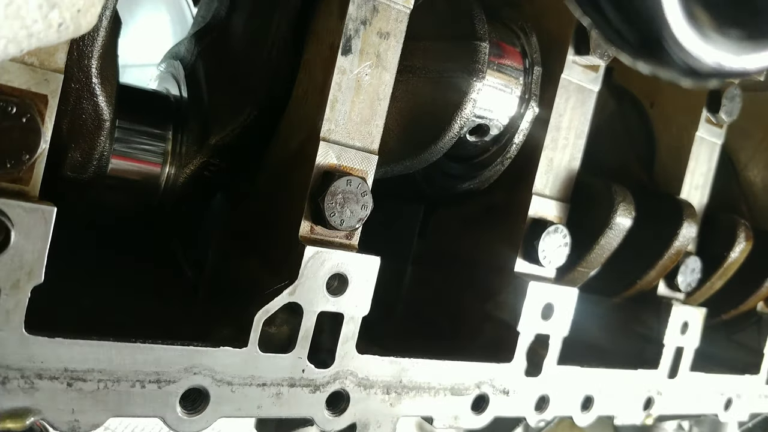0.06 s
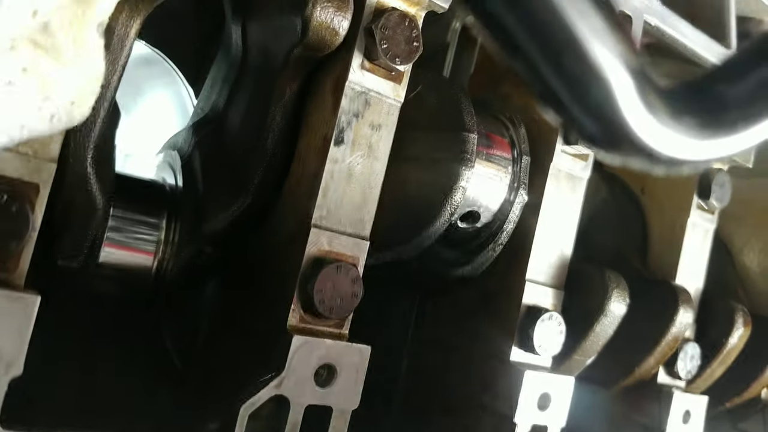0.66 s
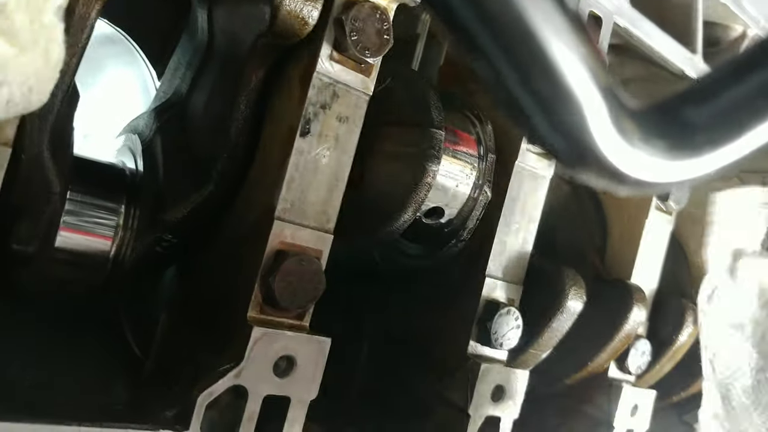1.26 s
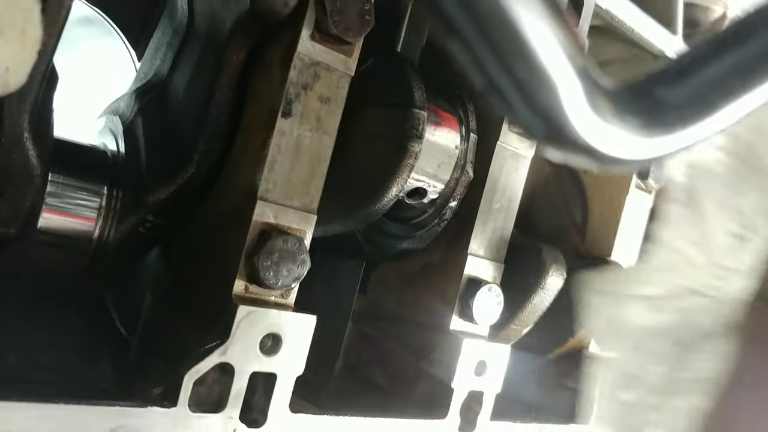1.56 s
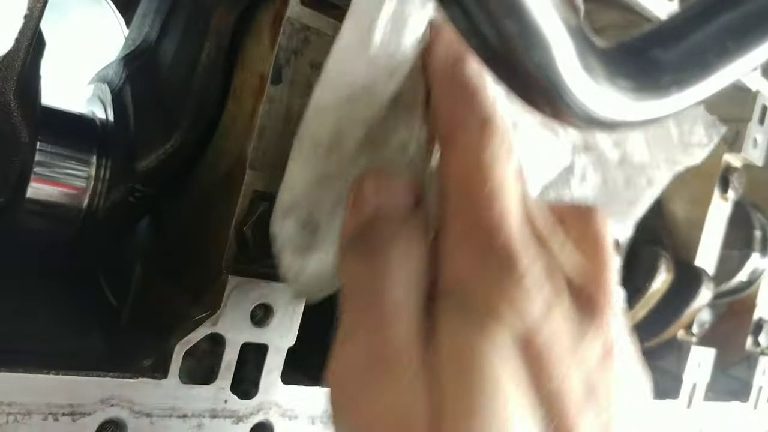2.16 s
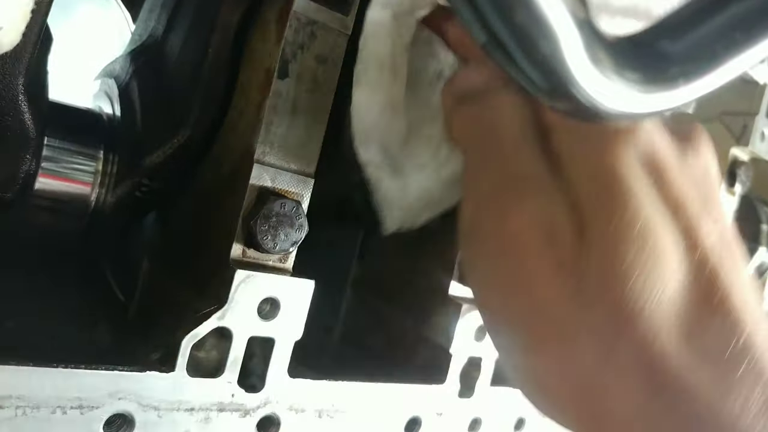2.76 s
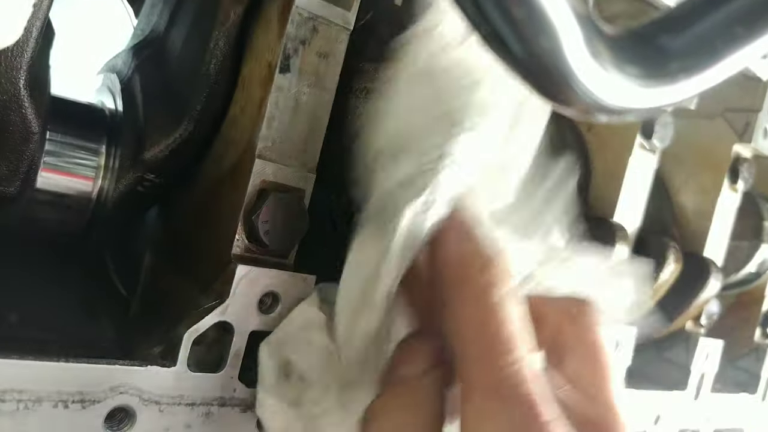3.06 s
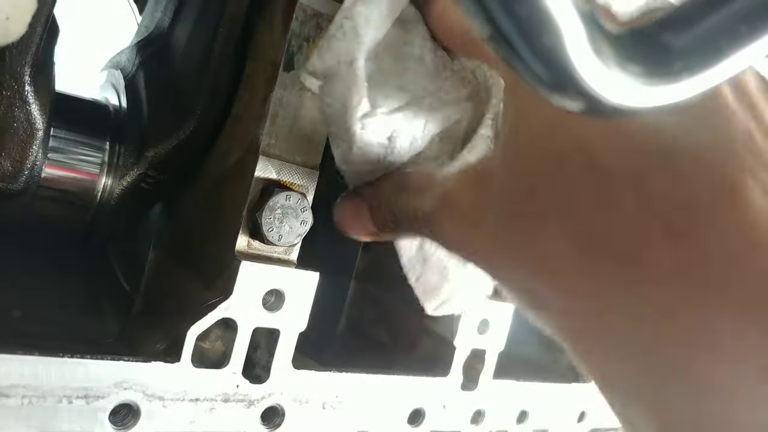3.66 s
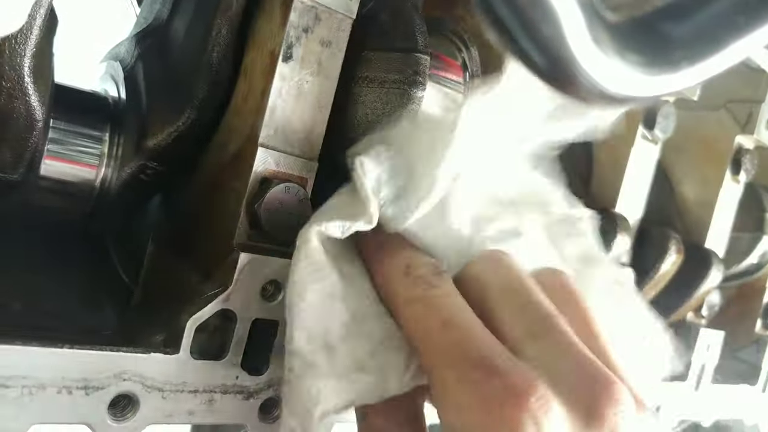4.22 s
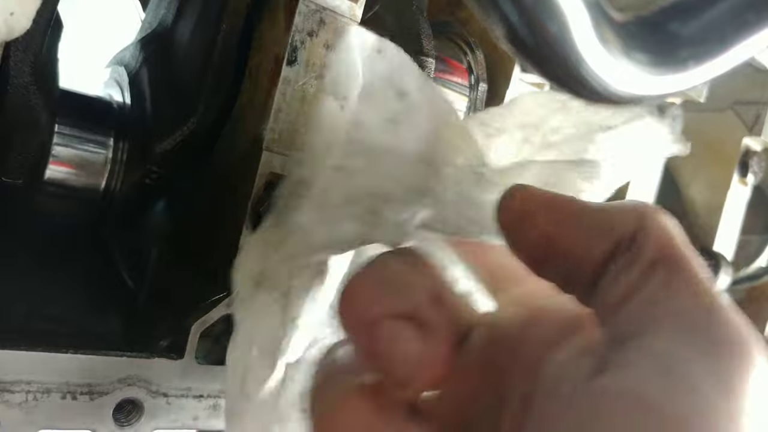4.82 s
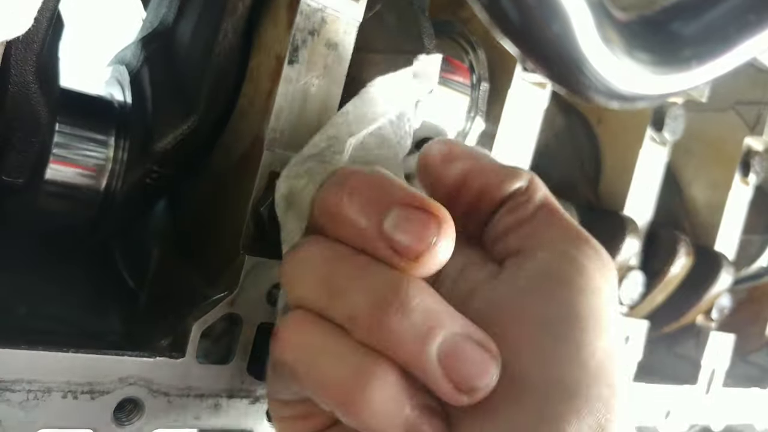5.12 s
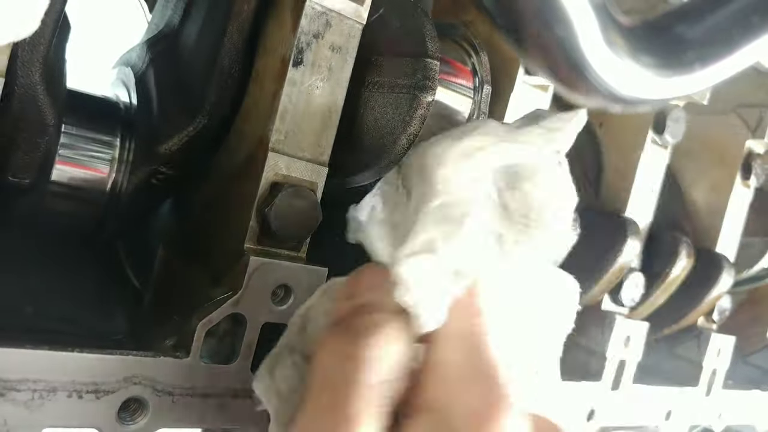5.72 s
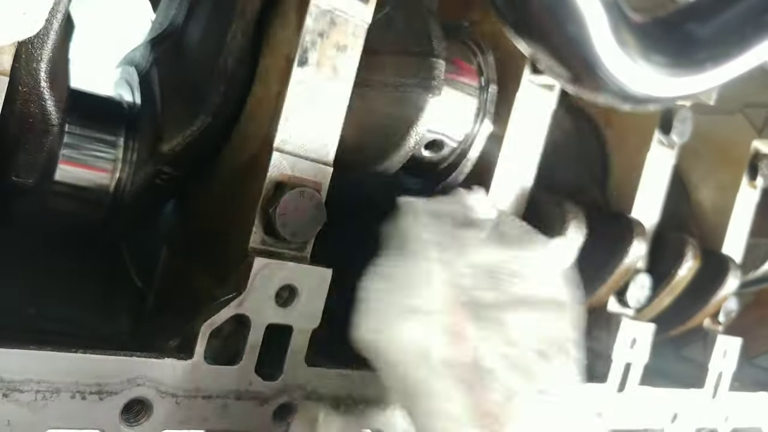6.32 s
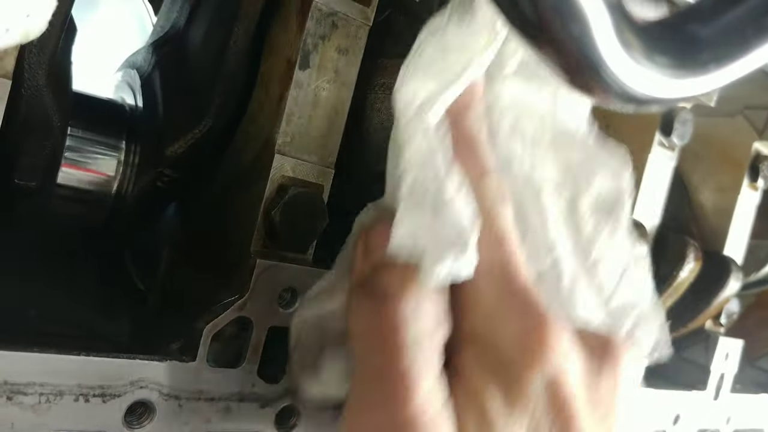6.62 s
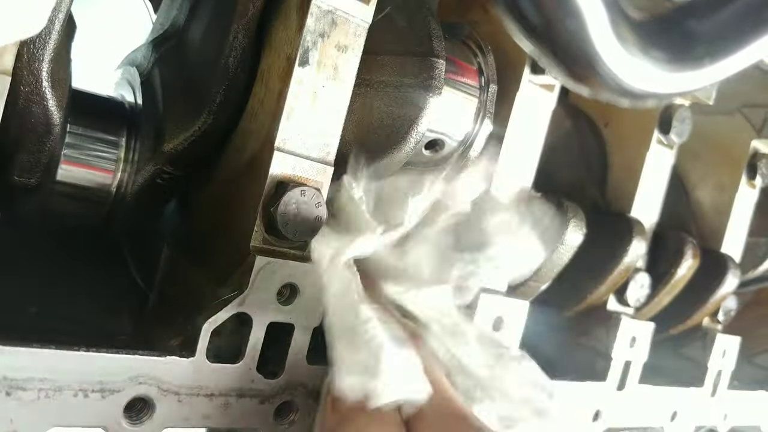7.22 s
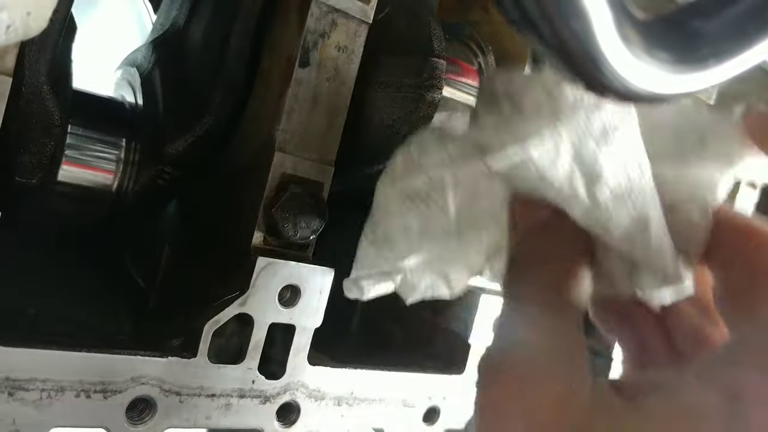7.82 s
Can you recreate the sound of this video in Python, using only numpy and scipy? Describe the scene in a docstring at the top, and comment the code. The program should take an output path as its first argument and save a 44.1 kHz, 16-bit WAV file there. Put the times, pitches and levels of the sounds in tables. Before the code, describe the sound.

A cloth rag wipes back and forth over a steel engine part, rustling and crumpling close by in a quiet workshop.

```python
"""A cloth rag wipes to and fro over a polished crankshaft in an open engine block.
It is brought past a phone, rubbed on the steel and lifted off, each stroke swelling with the hand's speed.
Fibres catch and slip in a hiss, buckling folds ring the hollow crankcase, and loose cloth fans the air.
Folds snap, the hand bumps and knocks, and the rag squeaks once and scrapes once. The workshop is quiet."""
import sys
import numpy as np
from scipy import signal
from scipy.fft import rfft, irfft
from scipy.io import wavfile
from scipy.ndimage import uniform_filter1d

SR = 44100
rng = np.random.default_rng(int(sys.argv[2]) if len(sys.argv) > 2 else 0)


def transcribe(signal):
    """Save signal, clipped to [-1, 1], as a 16-bit WAV file at the path in sys.argv[1]."""
    frames = np.atleast_2d(signal).T
    limited = np.clip(frames, -1, 1)
    pcm = np.round(limited * 32767).astype(np.int16)
    wavfile.write(sys.argv[1], SR, pcm)


N = 347508
T = np.arange(N) / SR
FREQS = np.fft.rfftfreq(N, 1 / SR)


def undb(db):
    """Turn decibels into a number to multiply by."""
    return 10 ** (np.asarray(db) / 20)


def over_hz(points):
    """Join the rows of a (frequency, value) table into a curve."""
    hz, value = np.transpose(points)
    return np.interp(np.log(FREQS + 1), np.log(hz), value)


def shape(x, response):
    """Turn each frequency of a sound up or down."""
    return irfft(rfft(x) * response, N)


def above(hz, order):
    """A filter curve that keeps what lies above hz; a higher order cuts more steeply."""
    ratio = (FREQS / hz) ** order
    return ratio / np.sqrt(1 + ratio ** 2)


def unit(pair):
    """Scale a stereo pair so that the mean of its two sides has strength (rms) 1."""
    return pair / np.std(pair.mean(axis=0))


def steady(pair, span_s):
    """Even out the strength over span_s, keeping the quick flutter."""
    power = uniform_filter1d(pair.mean(axis=0) ** 2, int(span_s * SR))
    return pair / np.sqrt(power + 1e-4 * power.mean())


def walk(per_s):
    """A smooth random wobble, about 1 in size."""
    step = int(SR / per_s)
    stairs = np.repeat(rng.standard_normal(N // step + 1), step)
    return np.sqrt(1.5) * uniform_filter1d(stairs, step)[:N]


def slips(per_s, spread_db):
    """Two streams of tiny clicks, random in time and size."""
    hit = rng.random((2, N)) < per_s / SR
    size = undb(spread_db * np.minimum(rng.exponential(size=(2, N)), 4))
    return hit * size * rng.choice([-1, 1], (2, N))


# How much louder the left microphone is for each place of the rag: f/Hz, left minus right/dB
BALANCE_BESIDE = [(100, -3), (300, 1), (700, 0.6), (1300, 4), (2000, 7.9), (3600, 6), (4800, 0.1),
                  (6300, 2), (11000, 3.9)]
BALANCE_INSIDE = [(60, 39), (320, 5.5), (470, 1), (620, 1.5), (850, 4), (1150, 3), (1600, 12), (2500, 8.5),
                  (3900, 5), (4700, -8), (5700, 2.5), (6500, -5), (8000, 9), (11000, 13)]
BALANCE_LIFTED = [(400, 4), (850, 2), (1200, 3), (1700, 13), (2500, 6.5), (3900, 8), (4700, -1.5),
                  (5700, 4), (6500, 9), (8000, 4), (11000, 13)]
# How alike the two microphones sound: f/Hz, likeness from 0 to 1
LIKENESS = [(50, 0.41), (200, 1), (320, 0.86), (480, 0.74), (900, 0.51), (1700, 0.069), (2600, 0.35),
            (4000, 0.1), (8000, 0.028)]
def microphones(pair, balance, lead_rad=0.48):
    """Both microphones share the lows, the left ahead by lead_rad; each hears its own treble."""
    alike = np.clip(over_hz(LIKENESS), 0, .99)
    left, right = undb(over_hz(balance) / 2), undb(-over_hz(balance) / 2)
    shared, own = rfft(pair)
    blend = alike * np.exp(-1j * lead_rad) * shared + np.sqrt(1 - alike ** 2) * own
    middle = np.sqrt(left ** 2 + right ** 2 + 2 * alike) / 2
    return irfft(np.array([left * shared, right * blend]) / middle, N)


def places():
    """How much of the rag is beside the phone, inside the block and lifted clear."""
    entered = np.interp(T, [1.70, 1.80], [0, 1])
    lifted = np.interp(T, [7.24, 7.42], [0, 1])
    return 1 - entered, entered - lifted, lifted


def hand_speed(peak, rise, fall):
    """The hand speeds up and slows to rest. Gives the stroke's samples and its speed from 0 to 1."""
    span = slice(*np.searchsorted(T, [peak - rise, peak + fall]))
    ramp = np.interp(T[span], [peak - rise, peak, peak + fall], [0, 1, 0])
    return span, np.sin(np.pi / 2 * ramp)


# A held rag never lies quite still. What is left between strokes: part of the sound, level/dB
RESTING_DB = {"weave": -78.5, "fibres": -80, "nap": -92, "folds": -80, "air": -79.5}
# Strokes of the rag: fastest moment t/s, speeding up/s, slowing down/s, base level of the weave/dB,
# then fibres/dB, nap/dB, folds/dB and air/dB compared with the weave, and leftward lean/dB before scaling
STROKES = [(0.045, 0.26, 0.23, -45.5, -9, -19.5, -7.5, -10, 7),
           (0.283, 0.1, 0.14, -51, -1, -17.5, -1.5, -4.5, 11),
           (0.494, 0.17, 0.052, -51, 0.5, -15, -2.5, -5, 20.5),
           (0.594, 0.2, 0.076, -58.5, -1, -18, -5.5, -1.5, 18),
           (0.731, 0.09, 0.037, -62.5, 1, -15, -1.5, 2.5, 12),
           (0.792, 0.067, 0.076, -51, 0, -14, -6.5, -12.5, 18),
           (0.93, 0.098, 0.14, -53, 0.5, -16.5, -6.5, -5.5, 20),
           (1.164, 0.11, 0.1, -61, 2.5, -13, -14, -7, 9), (1.254, 0.05, 0.35, -63, -2, -17, -6.0, -2, 14),
           (1.787, 0.031, 0.19, -58.5, -2, -24, -3, -12, 22), (1.893, 0.12, 0.13, -60, -5, -14, 4.5, 3, 1),
           (2.17, 0.16, 0.06, -64, -1, -12, 2.5, -3, 13),
           (2.283, 0.19, 0.068, -45.0, -8.5, -22, -5, -14.5, 8.5),
           (2.425, 0.11, 0.16, -51.5, -8.5, -18, -1, -16.0, 12.5),
           (2.539, 0.11, 0.38, -67, -5, -12, 11, 1, 6),
           (2.794, 0.16, 0.095, -45.5, -6.5, -21.0, -1.5, -18.0, 11.5),
           (3.01, 0.19, 0.14, -52, -9, -17.5, -1.5, -17.5, 13.5),
           (3.165, 0.087, 0.053, -47, -5, -17.5, -1.5, -10, 8),
           (3.254, 0.067, 0.12, -51.5, -1, -15, 2.5, -12, 13),
           (3.406, 0.054, 0.08, -60, -6, -18, 5.5, 2, 16), (3.513, 0.1, 0.36, -48.5, -5, -13, 0, -17, 10.5),
           (3.694, 0.091, 0.125, -46, -6.5, -16, -6.5, -11.5, 10),
           (3.888, 0.067, 0.22, -56.5, -11, -19, -8, -24, 13),
           (4.05, 0.12, 0.16, -48.5, -7.5, -14, -0.5, -19.5, 9.5),
           (4.2, 0.07, 0.1, -62.5, -8, -16, -1, -5, 16), (4.312, 0.069, 0.094, -48, -12, -15.5, 1, -19, 3),
           (4.37, 0.078, 0.091, -52, -4, -18, 3, -22, 13),
           (4.481, 0.087, 0.12, -47.5, -5, -17.5, 0, -15.5, 8),
           (4.596, 0.031, 0.062, -47.5, -14.5, -25, -1.5, -12, 11),
           (4.672, 0.054, 0.28, -59, -5.5, -15.5, 3, -7, 16),
           (4.908, 0.021, 0.39, -49.5, -8, -18, -0.5, -14.5, 10.0),
           (5.13, 0.16, 0.12, -42.5, -1.5, -16, -5, -30, 7),
           (5.321, 0.096, 0.2, -51, -4.5, -17, -6.5, -15.5, 12),
           (5.513, 0.023, 0.043, -45.5, -9.5, -19.5, -6.5, -13, 4),
           (5.542, 0.21, 0.19, -60, -6.5, -15.5, -5, -12, 11),
           (5.762, 0.13, 0.051, -57, -6.0, -12.5, -13, -12, 7.0),
           (5.895, 0.11, 0.15, -52.5, -4.5, -15, -3.5, -10, 8.0),
           (6.034, 0.063, 0.27, -53.5, -11, -19.5, -7, -11.5, 10.0),
           (6.13, 0.09, 0.11, -66.5, -21, -23, 8.5, -8, -2),
           (6.321, 0.095, 0.11, -42.5, -6, -15, -2.5, -14, 7.0),
           (6.379, 0.12, 0.15, -53, -1, -15, 6.5, -9, 9),
           (6.661, 0.07, 0.39, -64.5, -3.5, -11, 6, -4.5, 7.0),
           (6.93, 0.15, 0.082, -45.5, -5, -13.5, -7, -14.5, 10),
           (7.105, 0.17, 0.087, -50, -2, -11.5, -6.5, -10, 8.5),
           (7.179, 0.046, 0.072, -46.5, -10, -12.5, -6, -12, 3),
           (7.304, 0.036, 0.049, -41, -3.5, -10, 3.5, -7, 6.0),
           (7.401, 0.23, 0.13, -47.5, -3.5, -12.5, 2.5, -10.5, 8.0),
           (7.645, 0.41, 0.11, -52, -0.5, -9.5, -1, -7.5, 7.0),
           (7.798, 0.2, 0.13, -46.5, -2, -12.5, -5, -9, 10.5)]
def effort(part, power):
    """One part of the sound grows as the hand's speed to this power; overlapping strokes add up."""
    energy = np.full(N, undb(RESTING_DB[part]) ** 2)
    for peak, rise, fall, db, fibres, nap, folds, air, _ in STROKES:
        span, speed = hand_speed(peak, rise, fall)
        part_db = {"weave": 0, "fibres": fibres, "nap": nap, "folds": folds, "air": air}[part]
        energy[span] += (undb(db + part_db) * speed ** power) ** 2
    return np.sqrt(energy)


def side_of_rag(usual_db=9, sway=0.53):
    """Left and right gains: each stroke rubs a little to one side of the usual spot."""
    weight, total = np.full(N, undb(RESTING_DB["weave"])), np.zeros(N)
    for peak, rise, fall, db, *_, lean_db in STROKES:
        span, speed = hand_speed(peak, rise, fall)
        weight[span] += undb(db) * speed
        total[span] += undb(db) * speed * (lean_db - usual_db)
    pan_db = sway * total / weight
    return undb(np.array([pan_db, -pan_db]) / 2)


def steel_walls(pair, t60=0.046, echo_db=1, moves_per_s=7, patterns=11):
    """Echoes off bare metal fade by 60 dB in t60 seconds; their pattern changes as the hand moves."""
    t, out = T[:2048], 0
    for k in range(patterns):
        echoes = rng.standard_normal((2, len(t))) * np.exp(-np.log(1000) * t / t60)
        echoes *= undb(echo_db) / np.linalg.norm(echoes, axis=1, keepdims=True)
        echoes[:, 0] = 1  # the direct sound
        away = np.abs((T * moves_per_s - k) % patterns - patterns / 2)
        fade = np.cos(np.pi / 2 * np.minimum(away, 1))
        out = out + signal.fftconvolve(pair * fade, echoes, axes=1)[:, :N]
    return out


def folds_shade(pair, broad_db=1.33, fine_db=2.1):
    """Shifting folds get between the rubbing and the phone, so peaks and dips wander through the hiss."""
    spectra = signal.stft(pair, SR, nperseg=1024)[2]
    chance = rng.standard_normal((2, *spectra.shape[1:]))
    broad = uniform_filter1d(uniform_filter1d(chance[0], size=24, axis=0), size=6, axis=1)
    fine = uniform_filter1d(uniform_filter1d(chance[1], size=2, axis=0), size=8, axis=1)
    gain = undb(broad_db * broad / broad.std() + fine_db * fine / fine.std())
    return signal.istft(spectra * gain, SR, nperseg=1024)[1][:, :N]


# Tone of the hiss beside the phone, inside the block and lifted clear: f/Hz, relative level/dB
HISS_BESIDE = [(350, -26), (600, 13), (672, -4.5), (1260, -6), (1850, 0.5), (2050, -5), (2240, 1.5),
               (3060, -6), (4690, -3), (5590, -11.5), (6330, -24.5), (7740, -16.5), (12000, -36),
               (15600, -65), (22000, -120)]
HISS_INSIDE = [(400, -44), (600, 7.5), (750, -1), (890, 6), (1000, -3), (1400, -3), (1620, 2), (2250, 2),
               (2560, 4), (3300, -4.5), (4250, -8.5), (4700, -5), (5450, -10.5), (6330, -25.5), (7900, -14),
               (12000, -24.5), (16000, -74)]
HISS_LIFTED = [(350, -33), (600, 13.5), (821, -8), (919, 2), (1000, -3), (2130, 3.5), (3260, -5),
               (3930, -6.5), (5450, -11.5), (6330, -19), (7640, -6), (12000, -13), (15600, -53),
               (22000, -120)]
def rubbing(nap_db=-1, catch_db=1.3):
    """Threads catch and slip: the coarse weave rasps, fibres hiss and the nap (surface fuzz) whispers."""
    gains = (effort("weave", power=1.66), effort("fibres", power=2.1),
             undb(nap_db) * effort("nap", power=1.72))
    catches = slips(per_s=5000, spread_db=3) * undb(catch_db * walk(per_s=130))
    grains = folds_shade(steel_walls(catches))
    # the weave takes the low band, the fibres the middle and the nap the top
    fine, finest = above(hz=3600, order=8), above(hz=6200, order=14)
    bands = np.sqrt(1 - fine ** 2), fine * np.sqrt(1 - np.minimum(finest, 1) ** 2), finest
    tones = HISS_BESIDE, HISS_INSIDE, HISS_LIFTED
    balances = BALANCE_BESIDE, BALANCE_INSIDE, BALANCE_LIFTED
    out = 0
    for share, tone, balance in zip(places(), tones, balances):
        hiss = shape(grains, undb(over_hz(tone)) * above(hz=796, order=4))
        heard = microphones(hiss, balance)
        for gain, band in zip(gains, bands):
            out = out + share * gain * steady(shape(heard, band), span_s=0.056)
    return out * side_of_rag()


# Notes at which the air in the crankcase rings: f/Hz, width/Hz, relative level/dB
HOLLOW_NOTES = [(322, 22.5, -2), (386, 32, -2.5), (462.7, 18.2, 5), (494.3, 23.3, 2.5), (517.8, 22, 3),
                (887.6, 8.7, -7), (1610, 54, -18), (2490, 64, -24), (3960, 71, -21), (4600, 57, -27)]
def crankcase():
    """Filter curve of the hollow around the crankshaft: its air favours a few notes."""
    return sum((-1) ** k * undb(db) / (1 + 2j * (FREQS - hz) / width)
               for k, (hz, width, db) in enumerate(HOLLOW_NOTES))


# Tone of a fold buckling in open air: f/Hz, relative level/dB
FOLD_TONE = [(100, -22), (210, 5), (310, 4), (420, 2), (600, -5.5), (900, -4), (1600, -19), (4000, -45),
             (10000, -55)]
def crumpling(stutter_db=2.4, span_s=0.065):
    """Folds buckle in stuttering pops, full beside the phone; in the block they ring the crankcase."""
    pops = slips(per_s=700, spread_db=3) * undb(stutter_db * walk(per_s=70))
    full = shape(pops, undb(over_hz(FOLD_TONE)))
    thin = shape(full, above(hz=480, order=3))
    near = steady(microphones(full, BALANCE_BESIDE, lead_rad=0), span_s)
    direct = steady(microphones(thin, BALANCE_INSIDE), span_s)
    ring = steady(microphones(shape(pops, crankcase()), BALANCE_INSIDE), span_s)
    beside, inside, lifted = places()
    near *= beside * undb(1.5)
    direct *= inside * undb(-11) + lifted * undb(-8)
    ring *= inside + lifted * undb(-4)
    return (near + direct + ring) * effort("folds", power=1.47)


# Tone of the air pushed by the cloth: f/Hz, relative level/dB
PUFF_TONE = [(15, -12), (40, -10), (65, -4.5), (80, -3), (98, -1.5), (125, -2.5), (190, -8), (300, -15),
             (600, -42)]
def flapping(gain_db=1.54):
    """Loose cloth fans low puffs of air at the microphones."""
    puffs = shape(slips(per_s=390, spread_db=-1), undb(over_hz(PUFF_TONE)))
    air = unit(microphones(puffs, BALANCE_BESIDE, lead_rad=1))
    return air * undb(gain_db) * effort("air", power=1.32)


# Tone of the quiet room: f/Hz, relative level/dB
ROOM_TONE = [(15, -8), (40, 2.5), (110, 7.5), (250, -12.5), (600, -18), (1000, -35), (4500, -44),
             (6500, -23.5), (12000, -32)]
def workshop(db=-71):
    """Faint, even room noise."""
    noise = shape(rng.standard_normal((2, N)), undb(over_hz(ROOM_TONE)))
    return undb(db) * unit(microphones(noise, BALANCE_BESIDE))


# Folds that snap: t/s, level/dB, centre f/Hz, time to fade by 60 dB/s
SNAPS = [(0.045, -44.5, 1900, 0.18), (0.267, -41.5, 2150, 0.1), (0.387, -44.5, 2300, 0.037),
         (0.492, -41, 2650, 0.019), (0.668, -57, 2480, 0.037), (0.712, -49.5, 4800, 0.06),
         (0.997, -45.5, 2780, 0.023), (1.354, -48.5, 2090, 0.017), (1.829, -49, 1670, 0.041),
         (1.896, -49, 2280, 0.063), (3.151, -39, 1490, .04), (3.460, -46, 2450, 0.077),
         (3.588, -49, 2450, .026), (4.007, -44, 1540, 0.024), (4.071, -46, 1270, 0.045),
         (4.157, -41, 1960, .06), (4.260, -53, 1580, 0.048), (4.304, -46.5, 2200, 0.12),
         (4.454, -43.5, 1940, 0.065), (4.501, -43, 1840, 0.024), (4.525, -45, 2600, .04),
         (4.831, -53, 2040, 0.064), (4.898, -46.5, 1730, 0.076), (5.384, -53, 2090, 0.04),
         (5.751, -58, 2040, .032), (6.635, -54, 1360, 0.068), (7.303, -42, 2090, 0.051),
         (7.794, -37, 2800, 0.037)]
def snaps(relative_width=0.77, dull_hz=4800, attack_s=0.0014):
    """A fold pulls taut: a short rush of slips, its tone set by the size of the fold."""
    out, t = np.zeros((2, N)), T[:8192]
    hz = np.fft.rfftfreq(len(t), 1 / SR) + 1
    for s, db, centre, t60 in SNAPS:
        tone = 1 / np.hypot(1, (hz - centre ** 2 / hz) / (relative_width * centre))
        tone /= np.hypot(1, (hz / dull_hz) ** 4)
        rush = irfft(tone * np.exp(2j * np.pi * rng.random((2, len(hz)))))
        fade = np.minimum(t / attack_s, 1) * np.exp(-np.log(1000) * t / t60)
        burst = undb(db) * unit(rush) * fade
        start = int(s * SR)
        out[:, start:start + len(t)] += burst[:, :N - start]
    return microphones(out, BALANCE_INSIDE)


# Soft bumps of the hand and rag: t/s, relative level/dB, f/Hz
BUMPS = [(0.247, -38.5, 90), (0.271, -37, 112), (0.377, -31.5, 115), (0.384, -28, 242), (0.495, -35, 220),
         (0.995, -39, 260), (1.897, -35, 59), (1.898, -34, 210), (2.644, -42, 136), (3.152, -34, 286),
         (4.07, -35.5, 248), (4.312, -39.5, 295), (5.752, -49, 308), (6.009, -41.5, 59), (6.082, -46, 51),
         (6.118, -33.5, 289), (6.15, -39, 175), (6.329, -49, 91), (6.643, -47, 62), (7.311, -35, 86)]
def bumps(gain_db=-2, swings=5):
    """Each bump gives a few low swings that die away quickly."""
    out = np.zeros(N)
    for s, db, hz in BUMPS:
        cycles = hz * np.maximum(T - s, 0)
        fade = np.exp(-np.log(1000) * np.minimum(cycles / swings, 2))
        out += undb(db + gain_db) * np.sin(2 * np.pi * cycles) * fade
    return shape(out, above(hz=42, order=3))


# Rise and fall of the hollow's lowest notes: t/s, change in level/dB
LOW_NOTE_LEVELS = [(1.7, -1.5), (2.0, 6.5), (2.4, -3), (2.55, 1.5), (2.8, -6.5), (3.1, 1.5), (3.3, -1.5),
                   (3.8, 0), (4.1, 2.5), (4.5, -1.5), (5.1, -5.5), (5.5, 4.5), (6.3, 0.5), (6.45, -2),
                   (6.75, 3.5), (7.35, -6.5), (7.8, 5.5)]
def low_note_swell(pair, split_hz=410):
    """The hollow's lowest notes grow louder and softer from stroke to stroke."""
    lows = shape(pair, 1 - above(split_hz, order=10) ** 2)
    gain = undb(np.interp(T, *np.transpose(LOW_NOTE_LEVELS)))
    return pair + lows * (gain - 1)


# Fingers knocking on the hollow through the cloth: t/s, relative level/dB
KNOCKS = [(1.828, -28), (2.187, -32), (2.532, -30.5), (2.643, -34), (2.942, -39), (3.148, -28.5),
          (3.244, -25.5), (3.552, -32), (3.585, -28), (3.695, -28), (4.068, -38), (4.156, -28),
          (4.368, -28), (4.498, -46), (4.603, -30), (4.897, -29), (5.04, -23.5), (5.751, -29), (6.324, -28),
          (6.377, -30), (6.634, -37), (7.307, -15), (7.412, -22), (7.797, -25)]
def knocks(gain_db=-7, push_s=0.00092, damping=0.88):
    """A padded finger gives one soft push, and the air in the crankcase rings briefly."""
    t = T[:4096]
    ring = sum(undb(db) * np.sin(2 * np.pi * hz * t) * np.exp(-np.pi * width * damping * t)
               for hz, width, db in HOLLOW_NOTES)
    push = np.sin(np.pi * np.minimum(t / push_s, 1)) ** 2
    knock = np.convolve(ring, push)
    hits = np.zeros(N)
    for s, db in KNOCKS:
        hits[int(s * SR)] = undb(db + gain_db)
    out = signal.fftconvolve(hits, knock / np.abs(knock).max())[:N]
    # the block is open on top, so the slow part of the push escapes
    return shape(out, above(hz=323, order=5))


def swell(start_s, end_s):
    """A smooth rise from silence to 1 and back."""
    return np.sin(np.pi * np.interp(T, [start_s, end_s], [0, 1])) ** 2


def squeak(start_s=5.225, end_s=5.33, from_hz=618, to_hz=572, gain_db=-54, rough=0.01):
    """Cloth sticks and slips regularly on the polished steel, falling in pitch as it slows."""
    hz = np.interp(T, [start_s, end_s], [from_hz, to_hz]) * (1 + rough * walk(per_s=250))
    phase = 2 * np.pi * np.cumsum(hz) / SR
    harmonics_db = (-1.5, 4.5, -22, -20)
    tone = sum(undb(db) * np.sin(k * phase) for k, db in enumerate(harmonics_db, start=1))
    return undb(gain_db) * swell(start_s, end_s) * tone


def scrape(start_s=7.14, end_s=7.22, hz=2600, width_hz=650, db=-43):
    """A tight fold drags over an edge and chatters around one pitch."""
    band = 1 / (1 + 2j * (FREQS - hz) / width_hz) ** 2
    chatter = shape(slips(per_s=1500, spread_db=2), band)
    return undb(db) * swell(start_s, end_s) * unit(microphones(chatter, BALANCE_INSIDE))


def scene(grip_db=1.41):
    """The rag in the quiet room; rubbing and crumpling waver as the grip tightens and loosens."""
    grip = undb(grip_db * walk(per_s=28))
    hiss = grip * rubbing()
    hollow = low_note_swell(grip * crumpling() + knocks())
    return hiss + hollow + snaps() + flapping() + bumps() + squeak() + workshop() + scrape()


def record(dry, top_hz=12250):
    """The phone steeply cuts off the highest treble."""
    return signal.sosfilt(signal.ellip(10, .2, 70, top_hz, fs=SR, output="sos"), dry)


dry = scene()
out = record(dry)
transcribe(out)
```